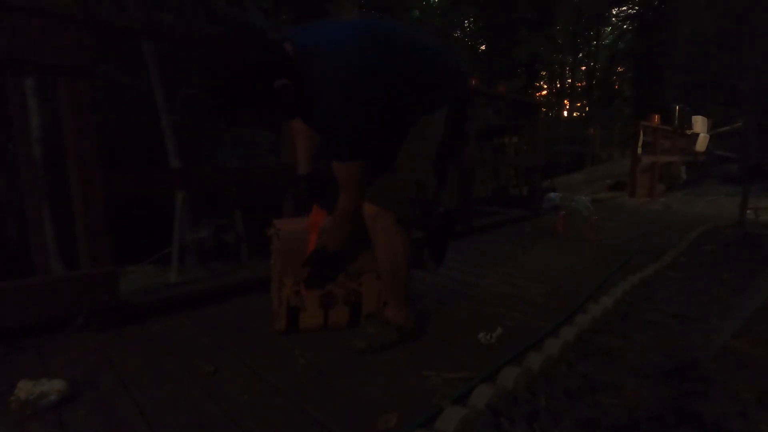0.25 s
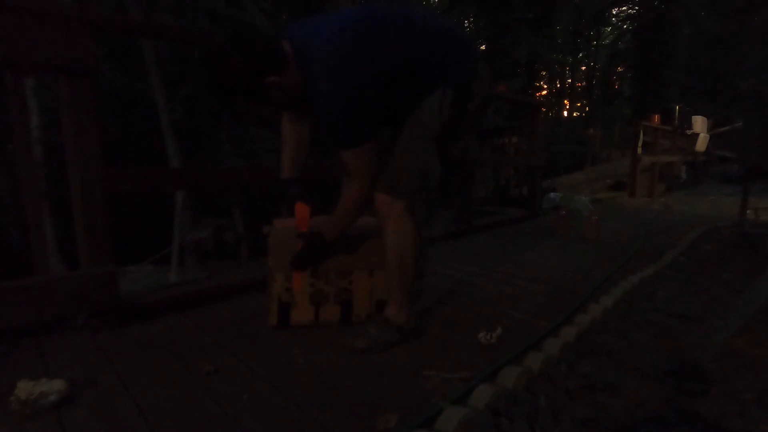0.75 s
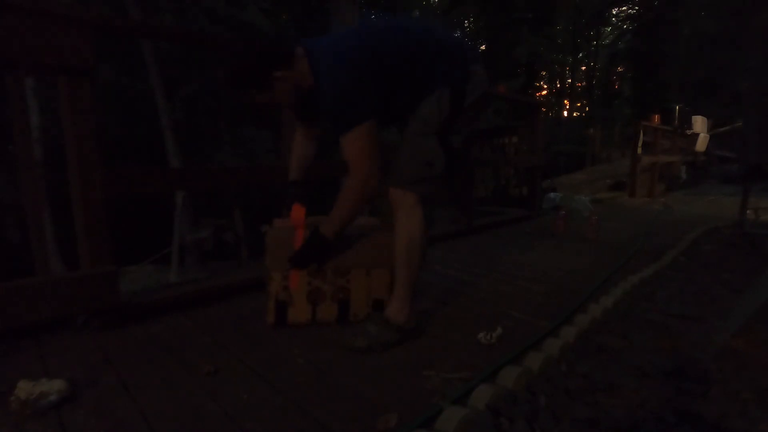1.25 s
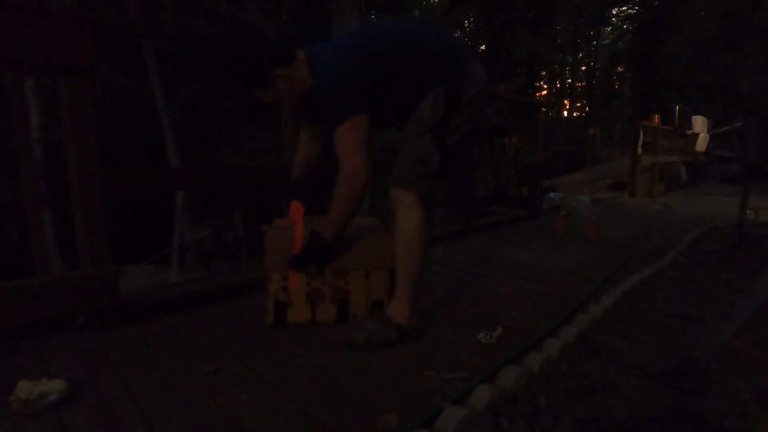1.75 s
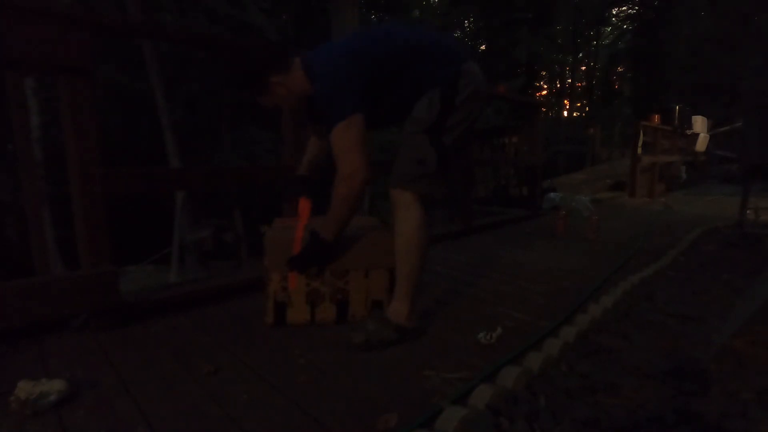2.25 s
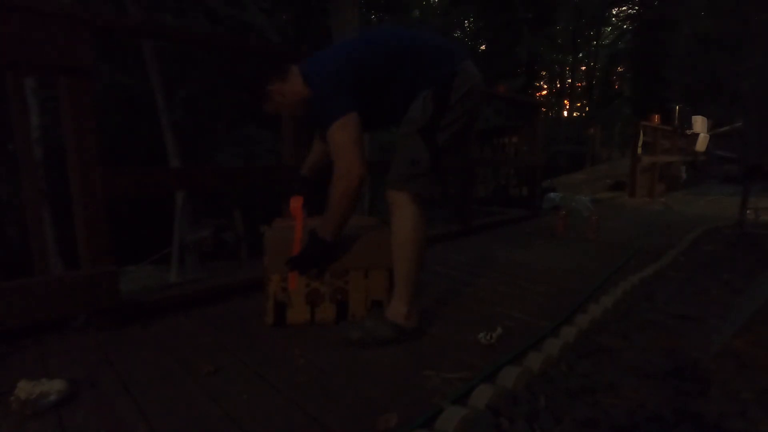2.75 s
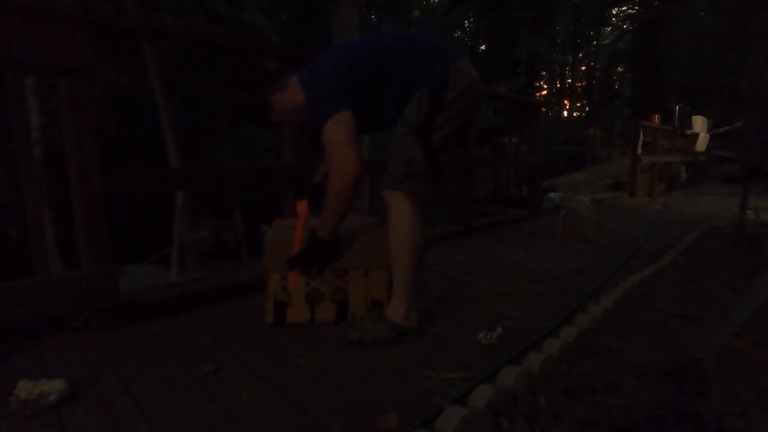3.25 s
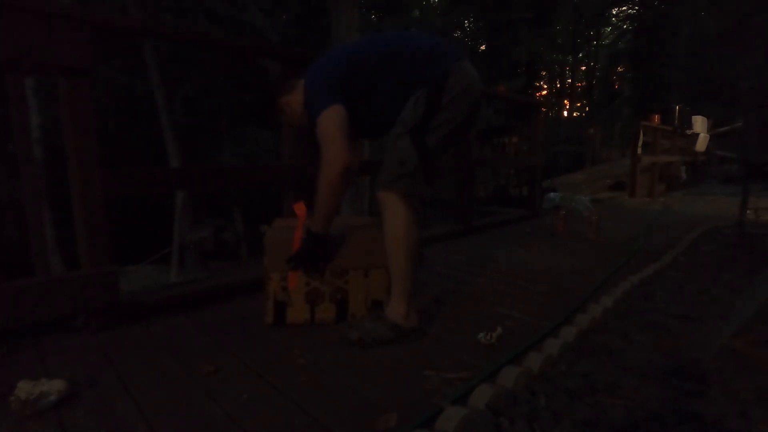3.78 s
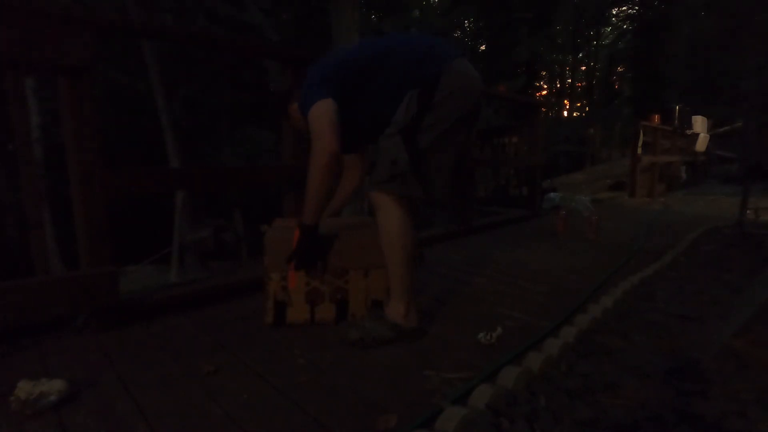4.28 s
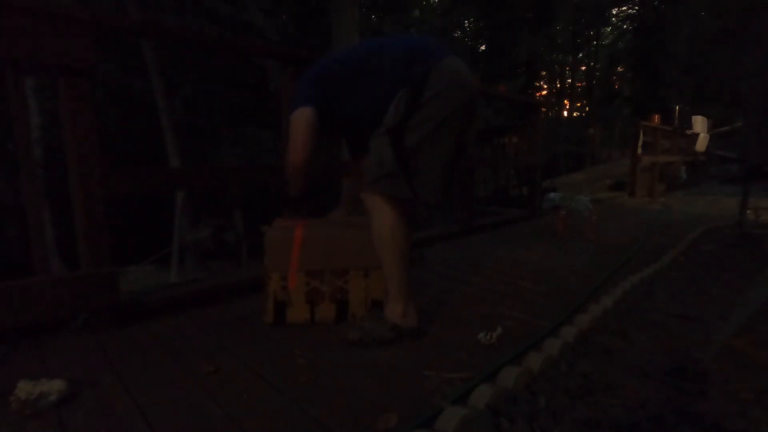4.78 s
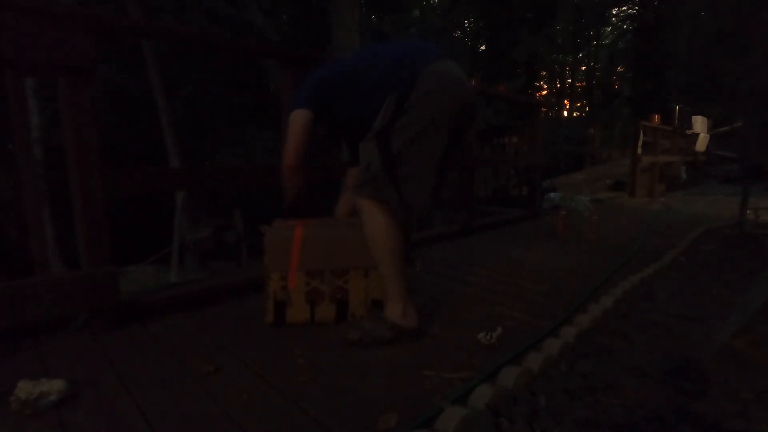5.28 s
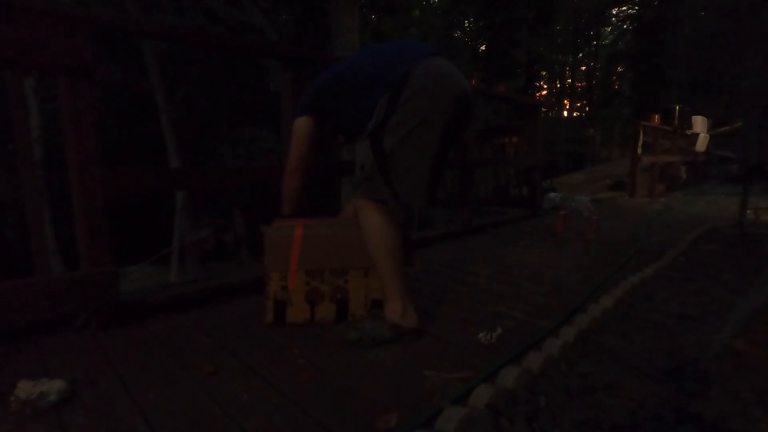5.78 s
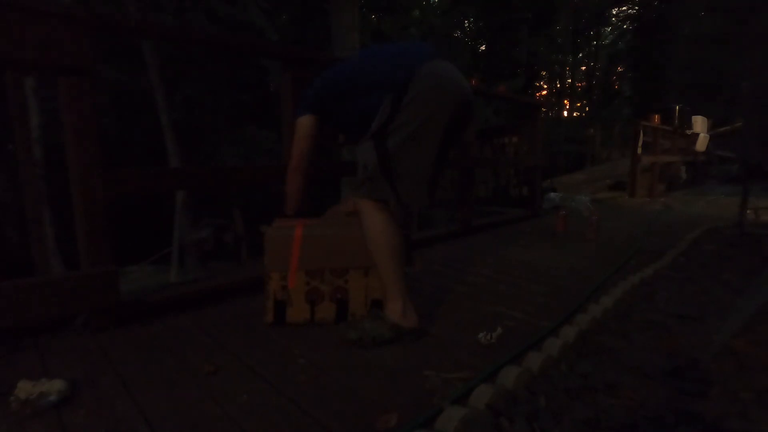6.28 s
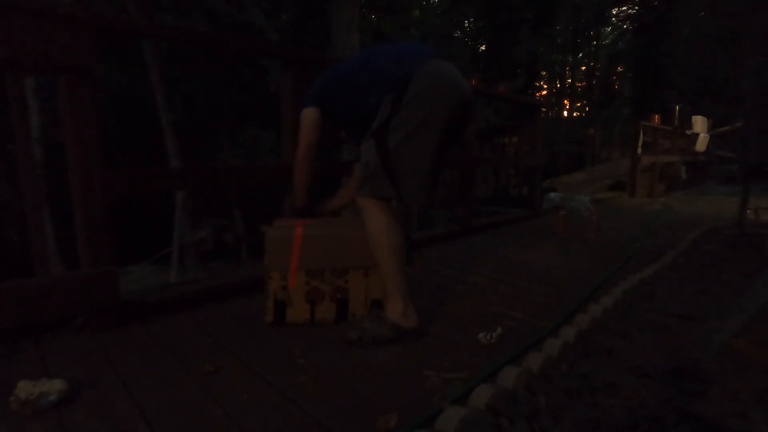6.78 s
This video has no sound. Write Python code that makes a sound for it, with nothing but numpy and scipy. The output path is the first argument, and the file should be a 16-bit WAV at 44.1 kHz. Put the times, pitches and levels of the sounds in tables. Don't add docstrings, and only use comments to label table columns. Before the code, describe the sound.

Outdoors in a yard, hands rub and knock webbing on a foam block, then a fast rasping ratchet run breaks out. Sharper clusters of metallic cracks follow at irregular intervals, each with a dull thump, thinning to single clicks. A near insect buzzes steadily over a far chorus and faint traffic. One microphone a few metres away turns down slightly after loud runs.

```python
import sys
import numpy as np
from scipy import signal
from scipy.io import wavfile
from scipy.ndimage import uniform_filter1d

SR = 44100
rng = np.random.default_rng(int(sys.argv[2]) if len(sys.argv) > 2 else 0)


def ratio_of_db(decibels):
    return 10 ** (np.asarray(decibels, float) / 20)


def bounce(signal):
    frames = np.transpose(np.atleast_2d(signal))
    limited = np.clip(frames, -1, 1)
    pcm = np.round(limited * 32767).astype(np.int16)
    wavfile.write(sys.argv[1], SR, pcm)


N = 310023


def rms_one(x):
    return x / np.sqrt(np.mean(x ** 2) + 1e-20)


def in_time(rows):
    s, *columns = np.transpose(rows)
    return [np.interp(np.arange(N) / SR, s, column) for column in columns]


def at_hz(points, hz):
    table_hz, value = np.transpose(points)
    return np.interp(np.log(hz), np.log(table_hz), value)


def drift(rate):
    r = np.exp(-80 * np.pi * rate / SR)
    white = rng.standard_normal(N // 40 + 2002)
    slow = signal.lfilter([1], [1, -2 * r, r * r], white)[2000:]
    return np.interp(np.arange(N) / 40, np.arange(len(slow)), rms_one(slow - slow.mean()))


def ring(clicks, hz, t60):
    r, w = ratio_of_db(-60 / (t60 * SR)), 2 * np.pi * hz / SR
    return signal.lfilter([0, np.sin(w)], [1, -2 * r * np.cos(w), r * r], clicks + 1e-18)


def band(x, low_hz, high_hz):
    return signal.sosfilt(signal.butter(2, [low_hz, high_hz], "band", fs=SR, output="sos"), x)


def noise_band(low_hz, high_hz):
    return band(rng.standard_normal(N), low_hz, high_hz)


def slips():
    # (time [s], ring level [dB], snap level [dB])
    lone = [(1.8084, -10, -20), (1.8168, -10, -18), (1.828, -13.5, -13), (1.8595, -7, -13.5),
            (1.8707, -4, -11.5), (1.8807, -11, -13), (1.8975, -9.5, -13.5), (2.1225, -9.5, -25),
            (2.1301, -22, -18), (2.1776, -14, -13.5), (2.1864, -8.5, -19), (2.197, -13, -15),
            (2.2054, -11.5, -13), (2.606, -9.5, -10), (2.6243, -10, -12), (2.6464, -10.5, -9),
            (3.001, -9.5, -21), (3.0115, -10, -21), (3.0203, -9.5, -20), (3.0328, -12, -16),
            (3.0482, -12, -16), (3.0533, -8, -15.5), (3.0646, -9.5, -11.5), (4.1261, -6.5, -17),
            (5.0336, -15, -25), (5.0449, -8.5, -21), (5.1177, -15, -20), (5.1278, -2, -11),
            (5.139, -8, -15), (6.023, -11, -24.5)]
    # (start [s], end [s], slips [count], first snap [dB], last snap [dB])
    runs = [
        (1.3945, 1.522, 27, -17, -23),
        (1.7698, 1.799, 7, -21, -19),
        (2.1369, 2.1699, 7, -17, -14),
        (4.1384, 4.1579, 5, -21, -17),
        (5.062, 5.1105, 10, -22, -23),
    ]
    jitter, spread_db = 0.16, 1.8
    rows = list(lone)
    for start, end, count, first_db, last_db in runs:
        along = np.linspace(0, 1, count)
        chance = rng.standard_normal((count, 3)).clip(-2, 2)
        s = start + (end - start) * (along + jitter * chance[:, 0] * (along > 0) / count)
        ring_db = -11.5 + spread_db * chance[:, 1]
        snap_db = first_db + (last_db - first_db) * along + spread_db * chance[:, 2]
        rows += list(zip(s, ring_db, snap_db))
    return tensioned(*np.transpose(sorted(rows)))


def tensioned(s, ring_db, snap_db):
    # (start [s], end [s], first block thump [dB], last block thump [dB], fizz [dB re snap])
    pulls = [
        (1.392, 1.535, -30, -18.5, -15),
        (1.755, 1.841, -17.5, -22, -9.5),
        (1.851, 1.903, -20, -15, -5.5),
        (2.12, 2.22, -21, -24.5, -11),
        (2.6, 2.652, -14, -16.5, -8.5),
        (3.0, 3.07, -20.5, -20, -7.5),
        (4.125, 4.157, -9.5, -17, -13.5),
        (5.03, 5.14, -14.5, -13, -23),
        (6.018, 6.03, -18.5, -16, -21),
    ]
    # (ring centre [Hz], upward stray of slips [octaves],
    # first block centre [Hz], last block centre [Hz])
    tension = [(1420, 0.13, 560, 200), (1400, .14, 198, 200), (1340, 0.21, 520, 535), (1360, 0.2, 320, 300),
               (1490, 0.056, 490, 440), (1555, .02, 400, 470), (1560, 0.028, 416, 350),
               (1460, 0.066, 378, 355), (1340, 0.21, 350, 390)]
    start, end, first_db, last_db, fizz_db = np.transpose(pulls)
    ring_hz, stray, first_hz, last_hz = np.transpose(tension)
    pull = np.searchsorted(start - .01, s) - 1
    along = np.clip((s - start[pull]) / (end - start)[pull], 0, 1)
    chance = rng.standard_normal((len(s), 3))
    thump_db = first_db[pull] + (last_db - first_db)[pull] * along + 1.5 * chance[:, 0]
    centre_hz = ring_hz[pull] * 2 ** (stray[pull] * np.abs(chance[:, 1]))
    fizz_db = snap_db + fizz_db[pull] + 2.5 * chance[:, 2]
    block_hz = first_hz[pull] + (last_hz - first_hz)[pull] * along
    pure_db = 12 - 28 * stray[pull]
    return np.transpose([s, ring_db, centre_hz, thump_db, snap_db, fizz_db, block_hz, pure_db])


def rasp(slipping):
    # (start [s], end [s], level [dB re the slips around])
    stretches = [
        (1.391, 1.516, -8.5),
        (1.774, 1.815, -8),
        (4.144, 4.162, -7.5),
    ]
    rows = []
    for start, end, db in stretches:
        s = np.arange(start, end, .004)
        s = s + 0.00099 * rng.uniform(-0.85, 1, len(s))
        between = [np.interp(s, slipping[:, 0], column) for column in slipping.T[1:]]
        rows += list(np.transpose([s] + between) + [0, db, 0, 2 * db, db, db, 0, 0])
    return rows


def strike(s, level_db, modes, spread_db, damping, rise_s, scatter, centre_hz=None, skirt_db=7):
    hz, mode_db, t60 = np.transpose(modes)
    t = np.arange(int(SR * t60.max()))[:, None, None] / SR
    chance = rng.standard_normal((len(s), 3, len(modes)))
    if centre_hz is not None:
        octaves = np.log2(hz / centre_hz[:, None])
        mode_db = mode_db - np.minimum(40 * octaves ** 2, np.reshape(skirt_db, (-1, 1)))
    gain = ratio_of_db(mode_db + spread_db * chance[:, 0] - 60 * t / (t60 * damping))
    phase = 2 * np.pi * hz * (1 + .013 * chance[:, 1]) * t + scatter * chance[:, 2]
    onset = 1 - np.exp(-(t[:, 0] / rise_s) ** 2)
    rings = np.sum(gain * np.sin(phase), axis=2) * onset
    rings *= ratio_of_db(level_db) / np.abs(rings).max(axis=0)
    out = np.zeros(N)
    np.add.at(out, np.round(s * SR).astype(int) + np.arange(len(t))[:, None], rings)
    return out


def cracks(table, damping, gain_db):
    # (frequency [Hz], level [dB], time to fall 60 dB [s])
    buckle = [(1000, -5, 0.021), (1239, 4, 0.0084), (1340, 2, 0.013), (1602, -6.5, 0.021),
              (1729, 3.5, 0.012), (1948, 7, 0.0054), (2212, -1.5, 0.019), (2410, 0, 0.018),
              (2718, 2.5, 0.014), (3020, 10.5, 0.0056)]
    block = [(116, -12, 0.077), (170.3, -5, 0.04), (276.5, -5, 0.041), (391, 1, 0.031),
             (456.5, -4.5, 0.055), (510, -2.5, 0.035), (629, -5.5, 0.012), (788, 2, 0.026)]
    snap = [(3350, 1, .014), (3780, 1, .016), (4280, 0, .016), (4650, -2, .015), (5050, -1, .015),
            (5500, -2, .013), (6000, -2, .013), (6700, -4, .012), (7500, -5, .011)]
    fizz = [(8500, -4, .011), (9200, 0, .012), (9800, 0, .012), (10400, -1, .012), (11300, -5, .01),
            (12500, -9, .009), (14000, -12, .007)]
    s, ring_db, centre_hz, thump_db, snap_db, fizz_db, block_hz, pure_db = np.transpose(table)
    snap_hz = 3900 * 2 ** (np.clip(fizz_db - snap_db + 20, 0, 8) / 28)
    body = -strike(s - .0004, ring_db + 2.0, buckle, 1.0, damping, .0008, .15, centre_hz, skirt_db=pure_db)
    body += strike(s, thump_db + 0.5, block, 2.67, damping, 0.0031, 0.37, block_hz, skirt_db=7.5)
    bright = strike(s - .0002, snap_db + 2.5, snap, 3.8, damping, 0.001, 1.34, snap_hz, skirt_db=7.0)
    bright += strike(s, fizz_db + 1.5, fizz, 2.4, damping, 0.0009, 1.0)
    rattle = rms_one(noise_band(150, 2700))
    return ratio_of_db(gain_db) * (body * (1 + .08 * rattle) + bright * (1 + .45 * rattle))


def ticks_and_knocks():
    # (time [s], ring level [dB], ring centre [Hz], block thump [dB], snap level [dB])
    ticks = [(0.5357, -17.5, 2320, -26, -21.5), (1.2156, -26, 1340, -29, -22.5),
             (2.5464, -24, 1310, -47, -16.5), (3.456, -26.5, 1420, -33, -26.5),
             (3.6728, -31.5, 2490, -51, -30.5), (4.0985, -25, 1960, -26, -22),
             (4.1093, -24, 1570, -28, -35), (5.425, -21.5, 1970, -28.5, -29), (5.921, -22, 1340, -25, -27),
             (6.3575, -30, 2100, -26.5, -29), (6.9405, -26, 1030, -32, -33)]
    knocks = [(0.0344, -19.5, 2740, -34, -25), (0.1062, -21.5, 1720, -34, -45),
              (0.1874, -38, 1300, -24.5, -42), (0.3032, -29.5, 1400, -52, -34),
              (0.751, -31, 1680, -57, -38), (0.9853, -26, 1020, -24, -37), (1.2926, -28, 1000, -24, -40),
              (1.533, -37, 1350, -29, -35), (2.063, -13.5, 1480, -11, -32), (2.089, -44, 1450, -25, -24),
              (2.3199, -35, 2210, -30, -38), (3.1278, -40, 1410, -27, -38),
              (5.0003, -17.5, 1510, -18.5, -16)]
    block_hz, pure_db = 395, 7
    rows = []
    for blows, fizz_re_snap_db in [(ticks, -6.5), (knocks, -18.5)]:
        for blow in blows:
            rows.append(tuple(blow) + (blow[-1] + fizz_re_snap_db, block_hz, pure_db))
    return cracks(rows, damping=0.7, gain_db=-3.5)


def hands():
    # (time [s], pressure [dB])
    rubbing = [
        (0.3, -51.5),
        (0.418, -33.5),
        (0.456, -61),
        (0.496, -37.5),
        (0.554, -46.5),
        (0.64, -61),
    ]
    scrape_db, = in_time(rubbing)
    t = np.arange(N) / SR
    fall_db = 66 * t
    rumble_db = -5 + np.maximum.accumulate(scrape_db + fall_db) - fall_db
    active = (t > rubbing[0][0]) & (t < rubbing[-1][0])
    size_db = 3.0 * np.minimum(rng.exponential(1, N), 4)
    grains = (rng.random(N) < 2200 / SR) * ratio_of_db(size_db) * rng.choice([-1, 1], N)
    scrape = ring(grains, 1570, 0.0031) + 0.59 * ring(grains, 2780, 0.0037) + 0.33 * ring(grains, 4050, 0.0035)
    rumble = ring(grains, 443, 0.019) + 0.31 * ring(grains, 160, 0.022)
    return active * (ratio_of_db(scrape_db) * rms_one(scrape) + ratio_of_db(rumble_db) * rms_one(rumble))


def near_insect():
    # (time [s], effort [dB], pulse depth [0-1], unevenness of the pulses [dB])
    song = [(.17, -58.5, 0.3, 3), (.8, -63, .36, 5.5), (1.1, -53, 0.2, -3.5), (1.67, -58, 0.4, -2),
            (2.85, -55.5, .46, -27), (3.3, -57.5, 0, 2.5), (3.9, -52, 0, -15), (4.3, -53, 0.1, -9),
            (4.65, -50.5, 0, -11), (4.9, -46, .02, -22), (5.35, -55.5, .46, -13), (5.65, -52.5, 0.6, -20),
            (5.8, -50.5, .98, -16), (6.2, -54.5, 1, -22), (6.9, -53.5, 1, -44)]
    # (time [s], rate [pulses per s])
    wing_rate = [(0, 149.7), (.8, 149.7), (1.1, 148.6), (2.4, 148.9), (3.3, 149.8), (5.6, 150.7),
                 (5.8, 151.3), (7.03, 151.5)]
    # (multiple of the rate, level [dB re the main even lines])
    overtones = [(24, -11), (32, -10), (54, -10), (56, -8), (58, -11), (76, -25), (78, -23), (80, -22),
                 (82, -26)]
    effort_db, depth, uneven_db = in_time(song)
    mid_db = effort_db - 6.5 * depth
    high_db = effort_db - 6.5 * (1 - depth)
    low_db = high_db - 0.5
    odd_db = effort_db + uneven_db
    even_db = 10 * np.log10((ratio_of_db(low_db) ** 2 + ratio_of_db(mid_db) ** 2 + ratio_of_db(high_db) ** 2) / 3)
    rate_hz, = in_time(wing_rate)
    phase = 2 * np.pi * np.cumsum(rate_hz * (1 + .0008 * drift(8.0))) / SR
    lines = [(26, low_db), (28, mid_db), (30, high_db)]
    lines += [(k, odd_db + 1 - 2.4 * abs(k - 28)) for k in range(23, 36, 2)]
    lines += [(k, even_db + db) for k, db in overtones]
    buzz = np.zeros(N)
    for k, db in lines:
        level = np.sqrt(2) * ratio_of_db(db + 3 * drift(8.0))
        buzz += level * np.sin(k * phase + 2 * np.pi * rng.random())
    return buzz


def chorus():
    # (centre [Hz], width [Hz], level [dB])
    singers = [(3240, 910, -9.5), (4215, 540, -3), (4990, 1700, -12), (6670, 1040, -1), (8610, 560, -6.5),
               (12060, 780, -19.5)]
    # (time [s], level [dB])
    swell = [(0, -52), (1.5, -50.5), (3, -53.5), (4.5, -48), (5.5, -47.5), (6.3, -45.5), (7.03, -44)]
    out = np.zeros(N)
    for hz, width_hz, db in singers:
        throb = ratio_of_db(db + 1.2 * drift(2.5) + 1.5 * drift(20.0))
        out += throb * rms_one(noise_band(hz - width_hz / 2, hz + width_hz / 2))
    return ratio_of_db(in_time(swell)[0]) * rms_one(out)


def air():
    # (frequency [Hz], level [dB per Hz])
    colour = [(30, -1.5), (60, -9), (121, -2), (190, -9.5), (319, -11.5), (404, -8), (632, -13.5),
              (1130, -10.5), (2060, -23.5), (4000, -15.5), (9000, -23), (11000, -40), (14000, -52)]
    edges = 25 * 2 ** np.arange(0, 9.6, .5)
    white = rng.standard_normal((2, N))
    out = np.zeros(N)
    for k, (low, high) in enumerate(zip(edges, edges[1:])):
        level_db = at_hz(colour, np.sqrt(low * high)) + 0.48 * drift(8.0) + 1.27 * drift(19.4)
        out += ratio_of_db(level_db) * band(white[k % 2], low, high)
    return ratio_of_db(-42.5) * rms_one(out)


def yard(x, ground_db, wall_db, tail_db):
    # (frequency [Hz], time to fall 60 dB [s])
    yard_t60 = [(200, 0.19), (500, 0.27), (1500, 0.17), (3000, 0.35), (5000, 0.29), (12000, 0.24)]
    # (frequency [Hz], level [dB])
    yard_db = [(200, 8), (500, 5.5), (1200, -3), (2400, -2.5), (5000, -1.5), (12000, 4.5)]
    t = np.arange(SR // 2) / SR
    tail = np.zeros(len(t))
    for low in 100 * 2.0 ** np.arange(7):
        fade_db = at_hz(yard_db, low * 1.4) - 60 * t / at_hz(yard_t60, low * 1.4)
        tail += band(rng.standard_normal(len(t)), low, low * 1.9) * ratio_of_db(fade_db)
    response = ratio_of_db(tail_db) * tail * np.minimum(t / .008, 1) / np.sqrt(np.sum(tail ** 2))
    echoes = np.zeros(len(t))
    echoes[[0, round(.003 * SR), round(.0055 * SR)]] = [1, ratio_of_db(ground_db), -ratio_of_db(wall_db)]
    stirring = rms_one(band(noise_band(60, 800), 60, 800))
    leaves = .6 * x + .9 * band(x * stirring, 1100, 15000)
    return (signal.fftconvolve(x, echoes) + signal.fftconvolve(leaves, response))[:N]


def scene():
    slipping = slips()
    strap = cracks(list(slipping) + rasp(slipping), damping=0.98, gain_db=2.5)
    strap += ticks_and_knocks() + hands()
    mid = yard(strap, ground_db=-17.5, wall_db=-13.5, tail_db=-9.5)
    background_top = signal.butter(12, 13100, fs=SR, output="sos")
    mid += signal.sosfilt(background_top, near_insect() + chorus() + air())
    return np.stack([mid, mid])


def band_limit(x):
    return signal.sosfilt(signal.butter(12, 16470, fs=SR, output="sos"), x)


def record(dry):
    slow = np.exp(-1 / (.9 * SR))
    loudness = signal.lfilter([1 - slow], [1, -slow], dry[0] ** 2)
    heard = dry[0] * (1 + loudness / ratio_of_db(-27) ** 2) ** -.2
    recovery_db = 250 * np.arange(N) / SR
    over_db = np.maximum(20 * np.log10(np.abs(heard) + 1e-9) + 5.5, 0)
    held_db = np.maximum.accumulate(over_db + recovery_db) - recovery_db
    heard = heard * ratio_of_db(-.9 * uniform_filter1d(held_db, size=41, origin=-12))
    heard = signal.sosfilt(signal.butter(2, 75, "high", fs=SR, output="sos"), heard)
    heard = signal.sosfilt(signal.butter(8, 13000, fs=SR, output="sos"), heard)
    top = signal.sosfilt(signal.butter(10, 11300, "high", fs=SR, output="sos"), heard)
    flicker = np.clip(drift(7.0) - .4, 0, .5) * 2
    apart = ratio_of_db(-23) * flicker * band(heard * rms_one(noise_band(20, 200)), 800, 10000)
    apart += ratio_of_db(-11) * top
    apart += ratio_of_db(-3) * top * rms_one(band(noise_band(30, 300), 30, 300))
    apart += ratio_of_db(-83) * rms_one(noise_band(5, 133))
    return band_limit(heard + apart * [[1], [-1]])


dry = scene()
out = record(dry)
bounce(out)
```